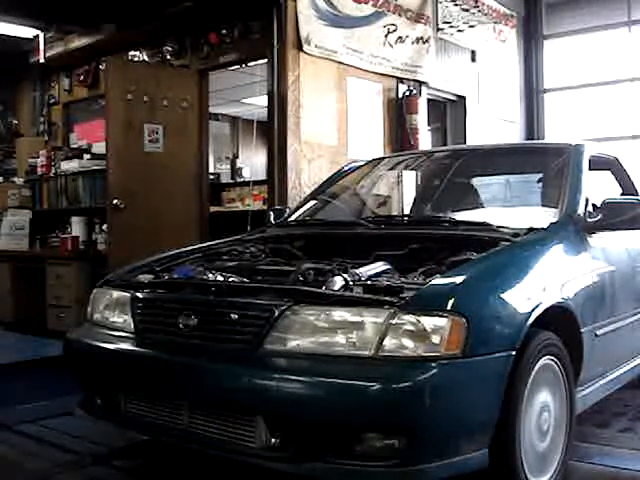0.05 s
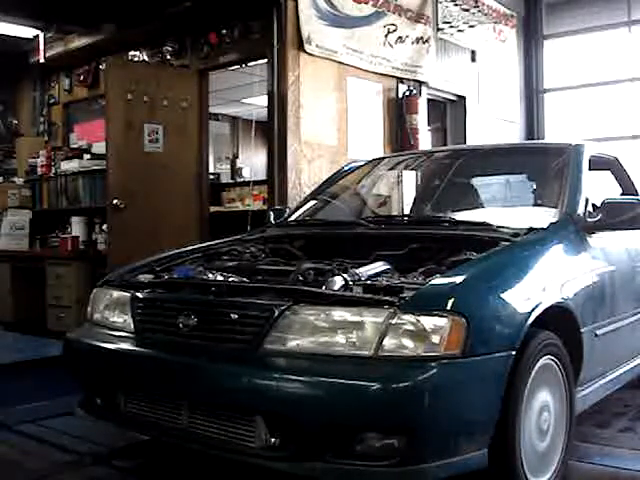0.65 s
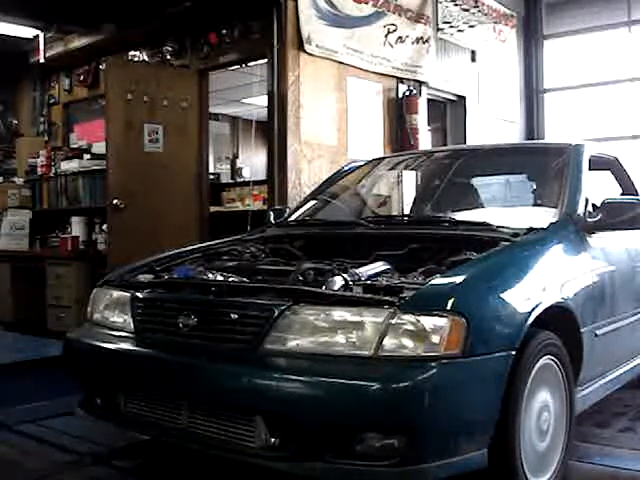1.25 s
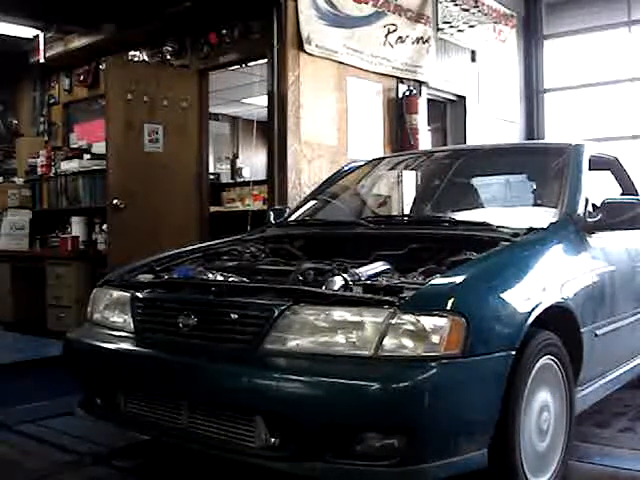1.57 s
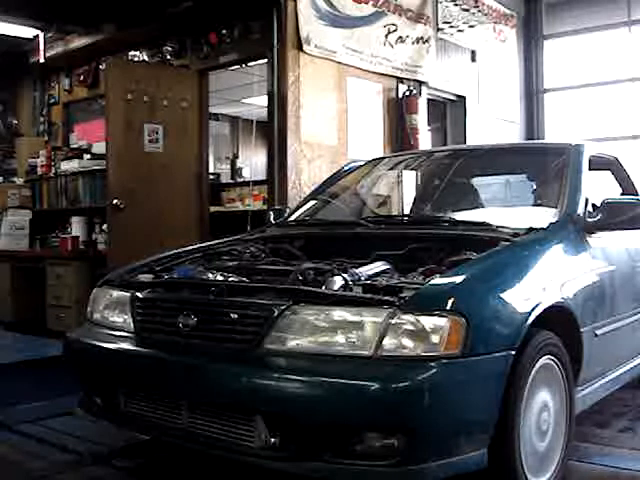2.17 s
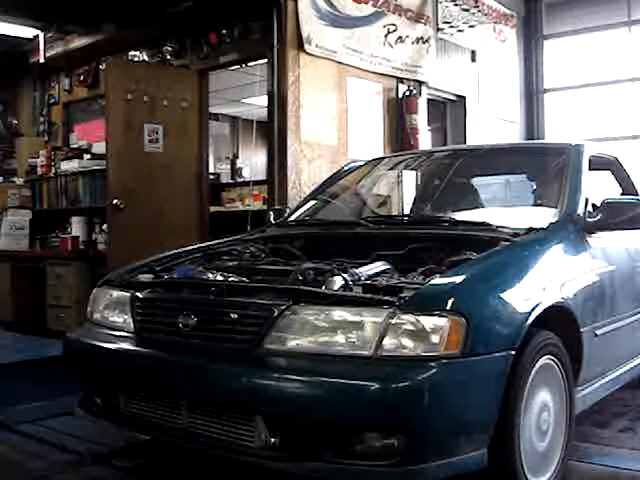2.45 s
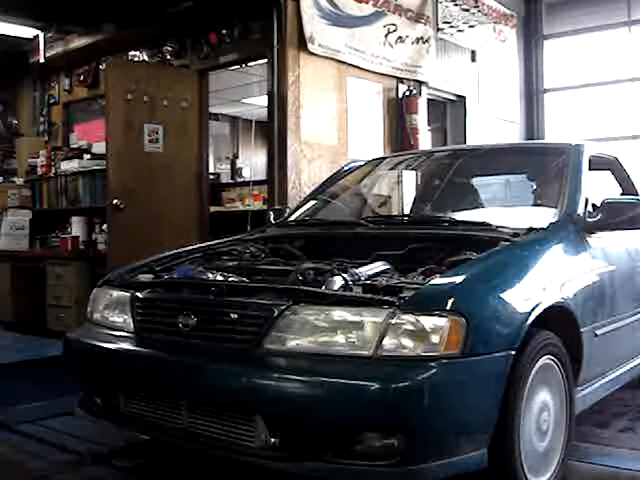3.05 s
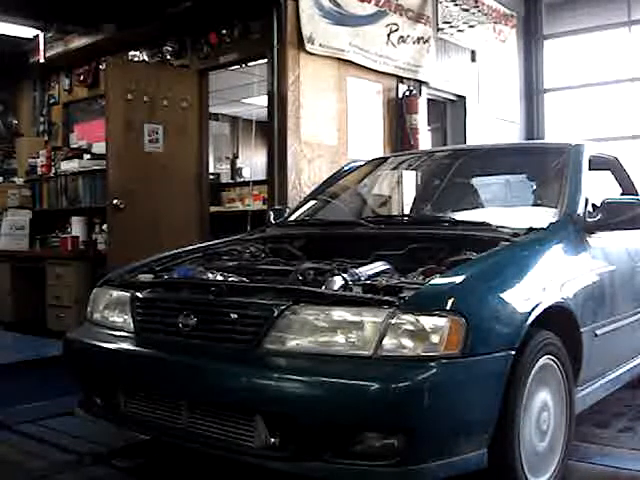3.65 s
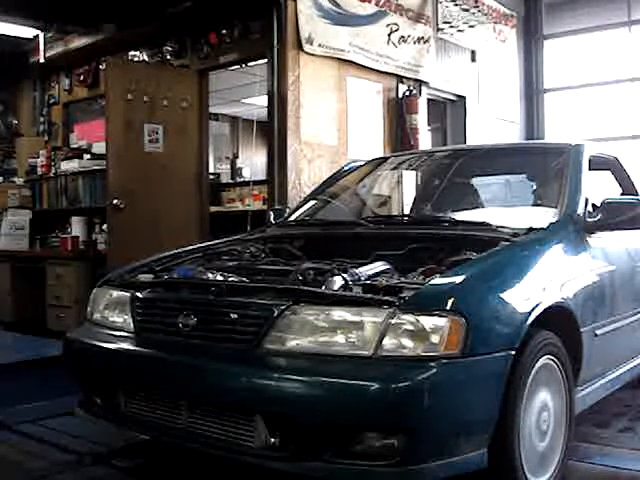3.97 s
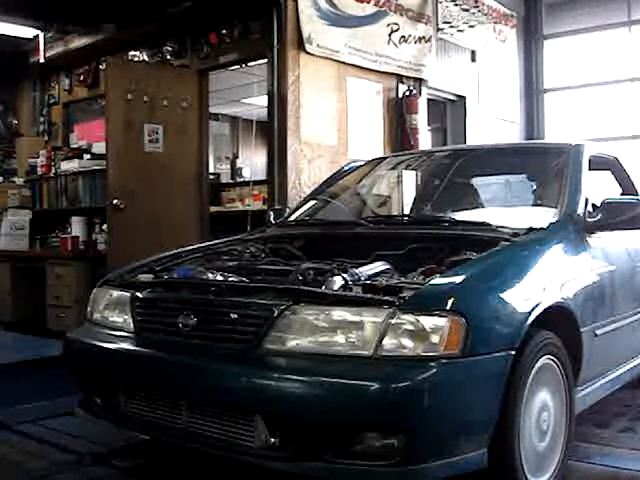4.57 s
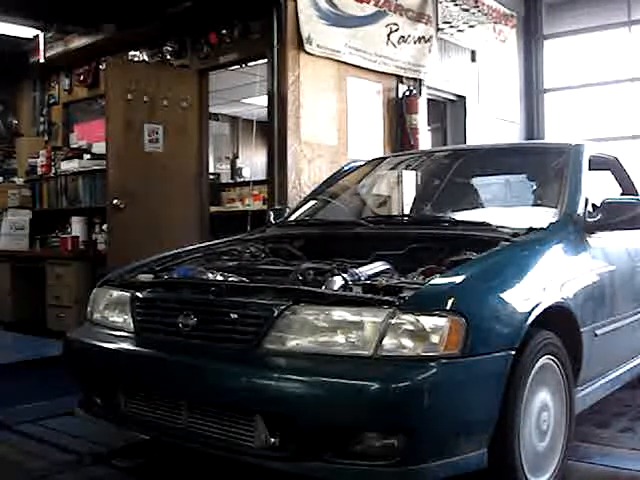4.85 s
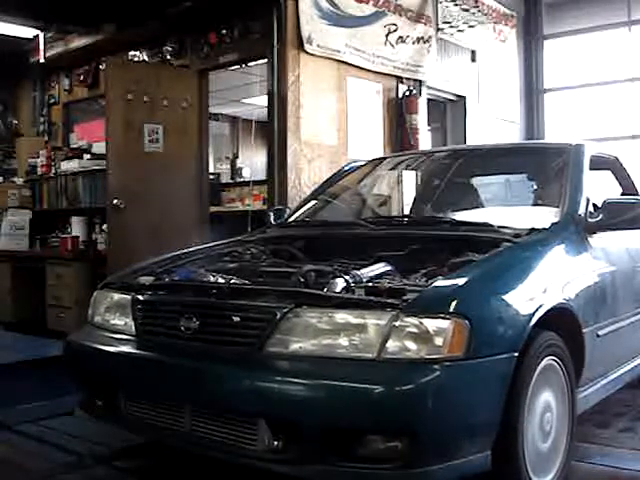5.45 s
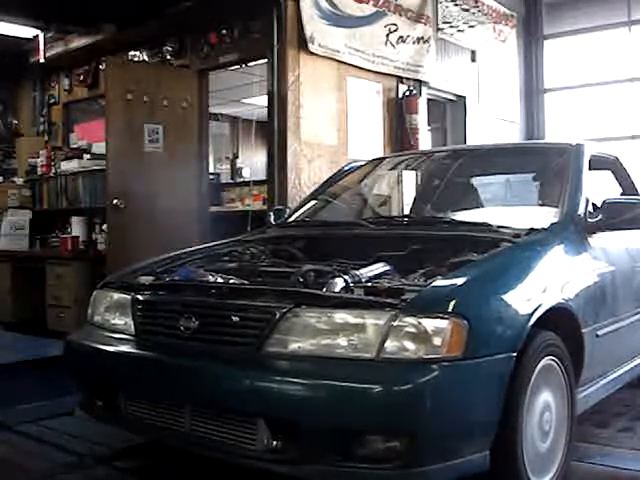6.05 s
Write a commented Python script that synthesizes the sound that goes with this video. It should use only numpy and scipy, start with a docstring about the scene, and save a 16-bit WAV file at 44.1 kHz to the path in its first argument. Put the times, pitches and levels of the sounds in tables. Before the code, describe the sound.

Loud rushing air and fast mechanical rattle come from a nearby turbocharged car engine, already at high revs and climbing steadily, with a short workshop echo. Thin whistling tones swell as it speeds up. After about five seconds, a valve releases air with a chuff and a quickly fading whistle. The engine slows while the spinning wheels and gearbox carry on in a broad roar.

```python
"""In a workshop, a turbocharged four-cylinder car speeds up on rollers, from about 4400 to 6000 rpm.
The exhaust note climbs under a loud hiss of sucked-in air and the clatter of the valves, which both
ring in the open engine bay. Then the clutch is pressed and the throttle shuts: spare turbo air whistles
out of the blow-off valve, the engine slows, and gearbox and wheels hum on in a duller roar.
A cooling fan blows faintly behind it all."""
import sys
import numpy as np
from scipy import signal
from scipy.fft import rfft, irfft
from scipy.io import wavfile

SR = 44100
rng = np.random.default_rng(int(sys.argv[2]) if len(sys.argv) > 2 else 0)


def store_pcm(level_fs):
    """Save levels as 16-bit WAV."""
    pcm = np.round(np.clip(level_fs, -1, 1) * 32767).astype(np.int16)
    wavfile.write(sys.argv[1], SR, np.atleast_2d(pcm).T)


N = 277830
TIME = np.arange(N) / SR
FREQS = np.maximum(np.arange(N // 2 + 1) * SR / N, 1)
CLUTCH_S, SHUT_S, SHUT_TAKES_S = 5.3, 5.35, .07  # the clutch is pressed, then the throttle shuts


def exhaust(cycles, cycle_hz, revs, load):
    """Four burns per engine cycle make a note and a boom; unequal cylinders add tones in between."""
    # exhaust tones: (multiple of the cycle rate, level at low, middle and high revs [dB])
    overtones = [(5, -71, -72, -58), (6, -66, -66, -66), (7, -55, -55.5, -47), (11, -55, -60, -57),
                 (12, -52.5, -63, -58), (13, -57, -64, -62), (14, -61, -66, -54), (15, -52, -62, -52),
                 (16, -54, -56, -52), (17, -61, -61, -52), (18, -65, -60, -48), (19, -58, -54, -57),
                 (20, -53, -56, -58), (21, -54, -54, -50), (22, -51, -53, -50), (24, -50, -51, -56),
                 (26, -51, -54, -49), (31, -51, -54, -49), (33, -51, -56, -51), (34, -51, -58, -51),
                 (45, -56, -56, -47), (48, -45, -52, -53)]
    # pitches at which the exhaust pipe rings: (pitch [Hz], width [Hz], boost [dB])
    pipe = [(322, 26, 5), (455, 30, 3), (580, 50, 5), (725, 40, 7), (840, 60, 10), (1575, 60, 8),
            (2130, 80, 5)]
    # pitches the room strengthens or weakens (standing waves): (pitch [Hz], width [Hz], boost [dB])
    room = [(139, 8, 9), (148, 5, -9), (154.5, 4, 8), (176, 5, -9), (298.5, 6, 5), (304.7, 5, -13),
            (308.5, 7, 10.5), (323, 7, 7.5), (336, 4, 6), (344, 5, 4.5), (374.5, 4, -6), (384, 22, 5),
            (394, 6, -10)]
    firing_db = -58.2 - 4.2 * revs + 6.5 * (1 - load) + peaks_db(4 * cycle_hz, room)
    boom_db = -39.5 - 5.5 * revs + peaks_db(8 * cycle_hz, room)
    firing = from_db(firing_db) * np.sin(2 * np.pi * 4 * cycles)
    boom = from_db(boom_db) * np.sin(2 * np.pi * 8 * cycles) * load ** 2
    tones = 0
    for multiple, *levels_db in overtones:
        # each tone wavers in level and timing, and sings out where the pipe rings
        level_db = -1.4 + with_revs(revs, *levels_db) + peaks_db(multiple * cycle_hz, pipe)
        gain = from_db(level_db + 2 * drift(5.4))
        phase = multiple * (cycles + 0.0041 * drift(14)) + rng.random()
        tones += gain * np.sin(2 * np.pi * phase)
    # no two burns are equally strong, and shutting the throttle weakens them all
    burn = (1 + 0.3 * drift(25)) * (0.44 + 0.56 * load)
    tones = workshop(tones * burn, echo_s=.6, echo_db=-9)
    roughness = 1 + 0.17 * drift(14)
    return np.sqrt(2) * ((firing + boom) * roughness + tones)


def intake(cycles, revs, colour, throb, flutter_db):
    """Air hisses through the turbo and is gulped by each of the four cylinders in turn."""
    stroke = 2 * np.pi * 4 * cycles
    gulps = 1 + throb * np.cos(stroke) + 0.14 * np.cos(2 * stroke) + 0.1 * np.cos(2 * np.pi * cycles)
    air = workshop(noise(), echo_s=0.31, echo_db=-8.5)
    return in_bay(air * gulps * from_db(flutter_db * drift(28)), colour, revs)


def clatter(cycles, revs, points=1024):
    """Valves and pistons repeat one dense rattle every cycle, over rattle that is never the same."""
    # tone colour of the rattle: (pitch [Hz], level [dB])
    colour = [(100.0, -27.5), (200.0, -16), (400.0, -11.5), (650.0, -11.5), (850.0, -4), (1400.0, -4),
              (2200.0, -0.7), (3000.0, -3.5), (3800.0, 3.5), (6000.0, -27.5)]
    pattern = rng.standard_normal(points)
    repeating = unit_power(np.interp(cycles % 1, np.arange(points) / points, pattern))
    rattle = workshop(0.43 * repeating + noise(), echo_s=0.71, echo_db=-6.5)
    return in_bay(rattle * from_db(0.38 * drift(4.6)), colour, revs)


def turbo():
    """As pressure builds, the turbo's air ducts ring at one pitch after another until the throttle shuts."""
    # swells in the ducts: (peak time [s], half length [s], pitch [Hz], width [Hz], level [dB])
    ducts = [(3.003, 0.58, 7400, 67.0, -41), (3.008, 0.4, 5430, 118, -41.5),
             (3.834, 0.067, 1572, 30.0, -30), (3.94, 0.77, 3481.0, 146.0, -30),
             (3.98, 0.095, 7300, 102.0, -34), (4.386, 0.058, 7300, 92.0, -35), (4.48, 0.56, 4320, 166, -30),
             (4.68, 0.39, 4670, 114, -31), (4.704, 0.25, 5510, 127, -29), (4.703, 0.34, 5070, 123, -30.6),
             (4.85, 0.08, 7600, 80.0, -37), (5.084, 0.25, 7300.0, 113.0, -34.8),
             (5.16, 0.15, 6667.0, 88.0, -37.5), (5.17, 0.16, 6200, 133.0, -33)]
    rush = 0
    for peak_s, half_s, hz, width_hz, db in ducts:
        swell = np.exp(-((TIME - peak_s) / half_s) ** 2)
        rush += from_db(db) * swell * narrow_noise(hz, width_hz)
    return (1 - ramp(SHUT_S, SHUT_TAKES_S)) * rush


def blow_off(open_s=5.4, rise_s=0.014, hold_s=0.099, whistle_hz=6505):
    """Trapped air escapes through a valve: a low chuff, a hissing spit and a whistle that outlasts them."""
    # tone colour of the escaping air: (pitch [Hz], level [dB])
    colour = [(3000, -20), (7000, 2), (10000, -9)]
    opening = ramp(open_s, rise_s)
    fading_s = since(open_s + hold_s)
    wavering_hz = whistle_hz + 14 * drift(15)
    whistle_db = -29 - 78 * fading_s + 2 * drift(20)
    whistle = from_db(whistle_db) * np.sqrt(2) * np.sin(angle_of(wavering_hz))
    spit = from_db(-24.5) * opening * narrow_noise(whistle_hz - 80, width_hz=210)
    chuff = from_db(-30.5) * ramp(open_s - 0.026, rise_s) * narrow_noise(830, width_hz=125)
    hiss = from_db(-36) * opening * coloured(noise(), colour)
    return opening * whistle + from_db(-95 * fading_s) * (spit + chuff + hiss)


def coasting_roar():
    """A broad, even rush starts as the clutch is pressed, then swells."""
    # tone colour of the roar: (pitch [Hz], level [dB])
    colour = [(60, -49), (110, -26), (160, -19.5), (330, -10), (430, -10.5), (600, -4), (770, -7.5),
              (1190, -2.5), (1900, -3.5), (2200, -2), (3120, -2.5), (4300, -9.5), (6200, -17), (10000, -28)]
    # pitches at which the roar rings: (pitch [Hz], width [Hz], boost [dB])
    peaks = [(1500, 68, 2.5), (2130, 47, 9.5), (2380, 90, 4.5), (2920, 210, 3.5), (3160, 170, 1)]
    level_db = -23.5 + 6.5 * ramp(CLUTCH_S + 0.2, 0.23)
    rush = coloured(workshop(noise(), echo_s=0.57, echo_db=-10), colour, peaks)
    return ramp(CLUTCH_S, 0.079) ** 2 * from_db(level_db) * rush


def driveline(shaft_hz):
    """Gearbox and wheels hum on the rollers, louder as they speed up and louder still once they coast."""
    # tones of the hum: (multiple of the shaft's turning rate, level [dB])
    tones = [(4, -14), (5, -6), (6, -6), (8, 1.5)]
    level_db = -78 + 27 * ramp(0, CLUTCH_S) + 12 * ramp(CLUTCH_S, 0.76)
    angle = angle_of(shaft_hz)
    hum = sum(from_db(db) * (1 + 0.15 * drift(9.3)) * np.sin(multiple * angle) for multiple, db in tones)
    return np.sqrt(2) * from_db(level_db) * hum


def cooling_fan():
    """The draught from the fan makes a faint, low rumble."""
    # strength of the draught: (time [s], level [dB])
    levels = [(0, -73), (1.3, -55.5), (3.1, -55.5), (5.1, -57), (5.5, -69), (6.3, -53)]
    # tone colour of the draught: (pitch [Hz], level [dB])
    colour = [(15, 0), (45, -2.5), (70, -3.5), (120, -10.5), (300, -19.5), (1000, -36)]
    return from_db(in_time(levels)[0]) * coloured(noise(), colour)


def in_bay(sound, colour, revs):
    """The engine bay rings at fixed pitches, each more or less strongly as the engine speed changes."""
    # ringing of the bay: (pitch [Hz], width [Hz], boost at low, middle and high revs [dB])
    bay = [(835, 31.0, 2, -1, 0), (1230, 80, 6, 3, 4.5), (1563, 115, 5.5, 7, 7), (1820, 150, 5.5, 0.3, 1),
           (2154, 140, 6.6, 6, 5.5), (2691, 150, 9.5, 6.5, 4.5), (2910, 194.0, 3.9, 7.6, 7),
           (3327, 170.0, 6.4, 7, 1), (3650, 160, -5, -1.5, -1.5), (3780, 64.0, 2.5, -0.5, 4.5),
           (3990, 73.0, 1.5, 1.5, 2), (4150, 132.0, -6, 1.8, -2), (4643, 164, 6.5, 6, -6.5),
           (4770, 330, 3.5, 5, 6), (5220, 200, 3.5, 5.5, 6), (5490, 195.0, 3, 4, 7), (5630, 170, -4, 7, -6),
           (7318.0, 171.0, 0.5, -3, -9), (7550, 82.0, -4, -1.5, -2)]
    peak_sets = [[(hz, width, boosts[k]) for hz, width, *boosts in bay] for k in range(3)]
    return with_revs(revs, *[coloured(sound, colour, peaks) for peaks in peak_sets])


def workshop(sound, echo_s, echo_db):
    """Hard walls add a dense echo that fades by 60 dB in echo_s seconds."""
    tail = noise() * from_db(-60 * TIME / echo_s) * (TIME > .004)
    tail *= from_db(echo_db) / np.sqrt(np.sum(tail ** 2))
    return (sound + signal.fftconvolve(sound, tail)[:N]) / np.sqrt(1 + from_db(echo_db) ** 2)


def speeds(start_hz=36.48, climb_hz_per_s=3.03, idle_hz=7, jump_s=.1, hang_s=.11, run_down_s=1.3):
    """Engine cycles (two turns each) and shaft turns per second: equal until the clutch is pressed."""
    in_gear_s = np.minimum(TIME, CLUTCH_S)
    # the climb eases off as the drag of the rollers grows
    geared_hz = start_hz + climb_hz_per_s * in_gear_s - .114 * in_gear_s ** 2
    # the freed engine jumps in speed, then runs down towards idle
    freed_hz = geared_hz + 3 * ramp(CLUTCH_S, jump_s)
    cycle_hz = idle_hz + (freed_hz - idle_hz) * np.exp(-since(CLUTCH_S + jump_s + hang_s) / run_down_s)
    shaft_hz = geared_hz - 2.1 * since(CLUTCH_S)
    return cycle_hz, shaft_hz


def engine_load(drain_s=0.32):
    """How hard the engine works: 1 until the throttle shuts, then a drop and a fade as its air drains."""
    drained = 1 - np.exp(-since(SHUT_S + SHUT_TAKES_S) / drain_s)
    return from_db(-8.5 * ramp(SHUT_S, SHUT_TAKES_S) - 6 * drained)


def with_revs(revs, low, middle, high):
    """Blend three values or sounds as the engine goes from low to high speed."""
    low_share, high_share = np.maximum(1 - 2 * revs, 0), np.maximum(2 * revs - 1, 0)
    return middle + (low - middle) * low_share + (high - middle) * high_share


def coloured(sound, colour, peaks=()):
    """Give a sound a broad tone colour with ringing peaks on top, at power 1."""
    hz, db = np.transpose(colour)
    grid = FREQS[::20]
    gain = from_db(np.interp(np.log(grid), np.log(hz), db) + peaks_db(grid, peaks))
    return unit_power(irfft(rfft(sound) * np.interp(FREQS, grid, gain), N))


def peaks_db(hz, peaks):
    """The boost that a set of peaks gives at one pitch."""
    return sum(boost / (1 + (2 * (hz - centre) / width) ** 2) for centre, width, boost in peaks)


def noise():
    """An even hiss (white noise)."""
    return rng.standard_normal(N)


def narrow_noise(hz, width_hz):
    """Swirling air ringing around one pitch."""
    angle = angle_of(hz)
    return drift(width_hz) * np.cos(angle) + drift(width_hz) * np.sin(angle)


def drift(rate_hz, step=40):
    """A smooth random wobble of typical size 1; a higher rate wobbles faster."""
    memory = np.exp(-2 * np.pi * step * rate_hz / SR)
    kicks = rng.standard_normal(N // step + 2002)
    slow = signal.lfilter([1], [1, -2 * memory, memory ** 2], kicks)[2000:]
    return np.interp(np.arange(N) / step, np.arange(len(slow)), unit_power(slow))


def angle_of(hz):
    """The growing angle of something that turns hz times a second."""
    return 2 * np.pi * np.cumsum(hz * np.ones(N)) / SR


def from_db(db):
    """Turn decibels into a volume factor."""
    return 10 ** (np.asarray(db) / 20)


def unit_power(sound):
    """Scale to an average power of 1."""
    return sound / np.sqrt(np.mean(sound ** 2) + 1e-20)


def in_time(rows):
    """Join a table's timed points into one curve per level column."""
    times, *columns = np.transpose(rows)
    return [np.interp(TIME, times, column) for column in columns]


def ramp(start_s, length_s):
    """Rise evenly from 0 to 1."""
    return np.clip((TIME - start_s) / length_s, 0, 1)


def since(start_s):
    """Seconds gone by after a moment, 0 before it."""
    return np.maximum(TIME - start_s, 0)


def scene():
    """Mix all the sounds: engine speed sets the engine's pitch, and the throttle its strength."""
    # loudness with the throttle open: (time [s], clatter [dB], intake hiss [dB], high hiss [dB])
    levels = [(0.0, -21, -23.9, -34.5), (0.4, -22.5, -23.5, -34), (0.55, -22, -23.5, -33),
              (0.8, -22.4, -23.5, -33.5), (1.1, -24, -23.2, -33.5), (1.29, -22.5, -23.2, -34),
              (1.37, -26, -23, -31), (1.8, -24, -24.5, -33), (2.3, -24, -24, -28.5),
              (2.6, -24.5, -23.5, -30), (3.05, -25, -23.5, -28.5), (3.4, -24.5, -23.7, -30.5),
              (3.63, -24, -25, -28), (3.78, -24, -23, -30.5), (4.25, -23.5, -25.5, -32),
              (4.7, -23.8, -25.5, -31), (5.0, -23, -26.5, -30.5), (5.3, -22, -24, -33.5)]
    # tone colour of the intake hiss: (pitch [Hz], level [dB])
    hiss_colour = [(1500.0, -25), (2600.0, -4), (3300.0, -9), (4300.0, 0.4), (5500.0, -1.1), (6200.0, -1.5),
                   (8000.0, -17)]
    # tone colour of its highest part: (pitch [Hz], level [dB])
    high_colour = [(4500.0, -36), (6000.0, 4.5), (7000.0, 7.5), (8100.0, 6), (8700.0, -3), (9300.0, 2),
                   (10000.0, -12)]
    cycle_hz, shaft_hz = speeds()
    cycles = np.cumsum(cycle_hz * (1 + 0.001174 * drift(9.7))) / SR  # engine cycles so far
    revs = np.interp(cycle_hz, [37, 49], [0, 1])  # engine speed: 0 is low, 1 is high
    load = engine_load()
    clatter_db, hiss_db, high_db = in_time(levels)
    engine = from_db(clatter_db) * clatter(cycles, revs)
    engine += from_db(hiss_db) * intake(cycles, revs, hiss_colour, throb=0.1, flutter_db=0.93)
    engine += from_db(high_db) * intake(cycles, revs, high_colour, throb=0.091, flutter_db=1.5)
    tailpipe = exhaust(cycles, cycle_hz, revs, load)
    fan = cooling_fan()
    mono = load * engine + tailpipe + turbo() + blow_off() + driveline(shaft_hz) + coasting_roar() + fan
    return np.array([mono, mono])


def record(dry):
    """Cut the treble steeply above 10150 Hz."""
    return signal.sosfilt(signal.ellip(12, .1, 90, 10150, fs=SR, output="sos"), dry)


dry = scene()
out = record(dry)
store_pcm(out)
```